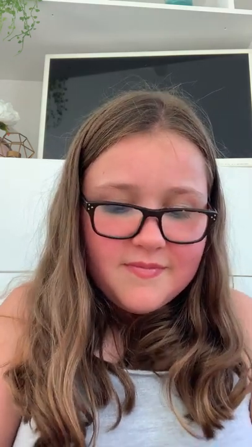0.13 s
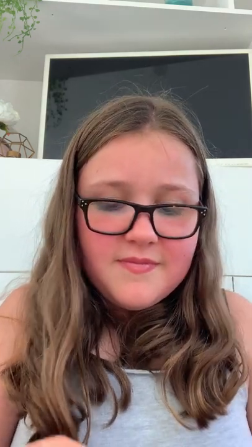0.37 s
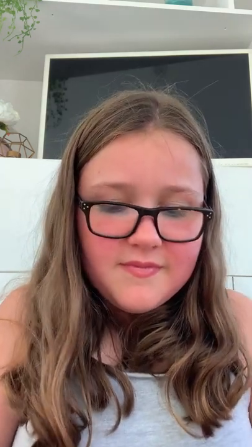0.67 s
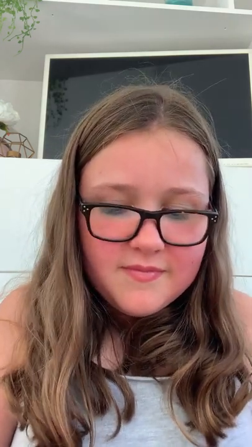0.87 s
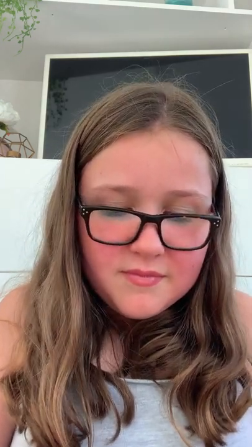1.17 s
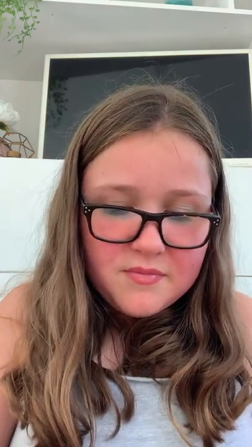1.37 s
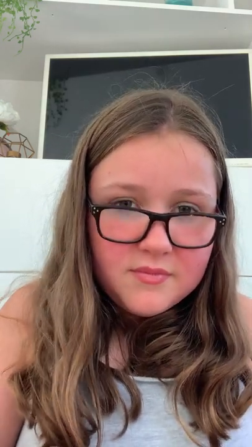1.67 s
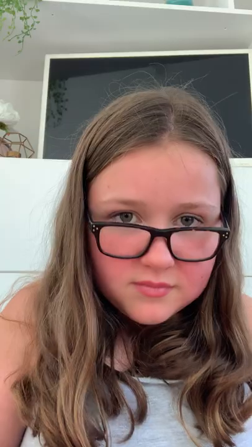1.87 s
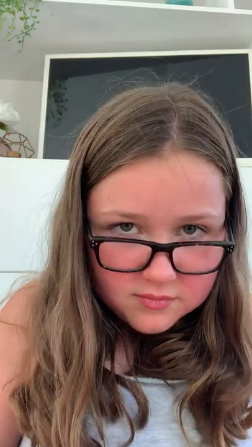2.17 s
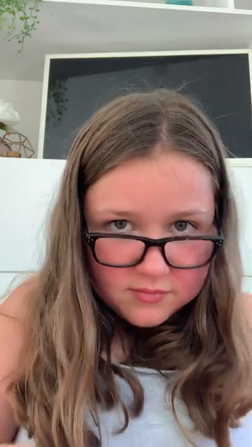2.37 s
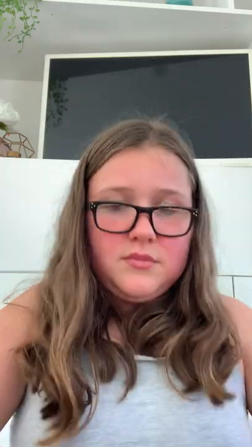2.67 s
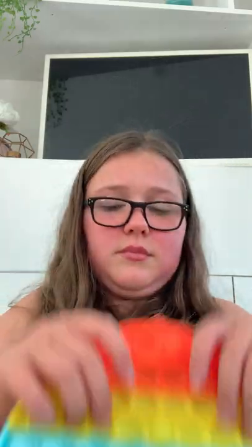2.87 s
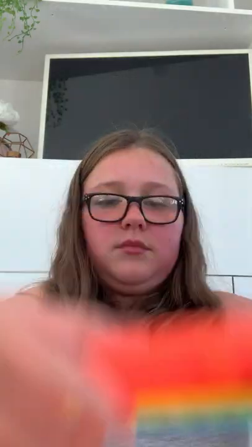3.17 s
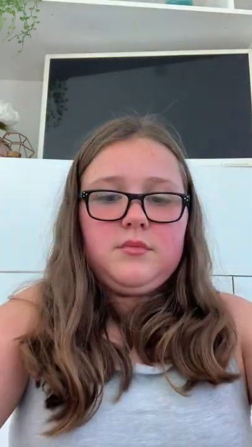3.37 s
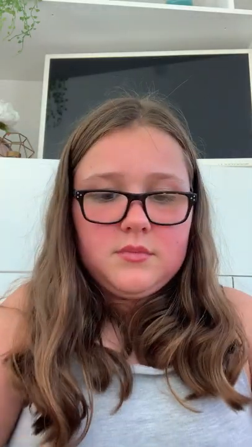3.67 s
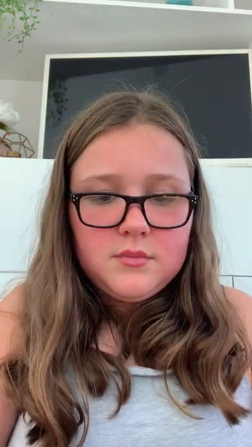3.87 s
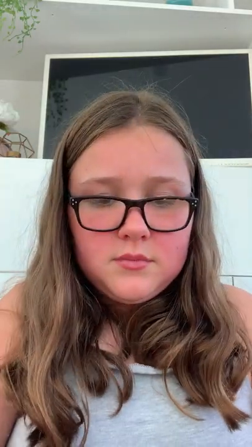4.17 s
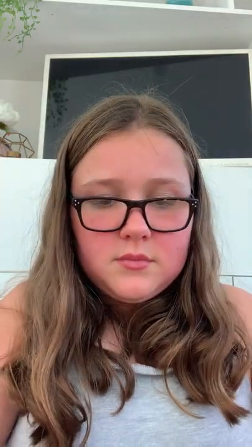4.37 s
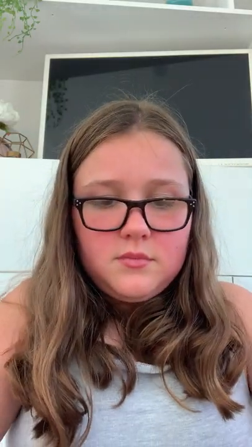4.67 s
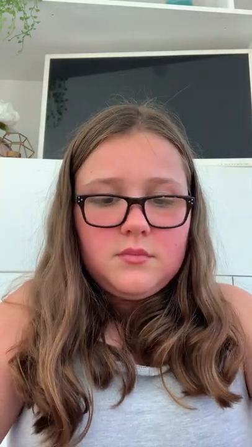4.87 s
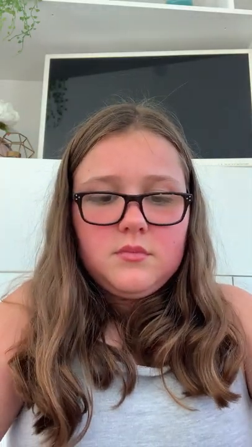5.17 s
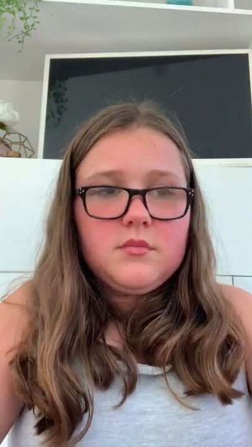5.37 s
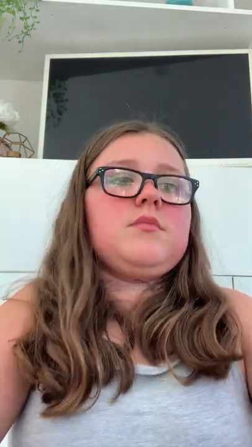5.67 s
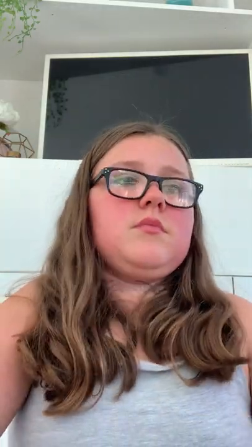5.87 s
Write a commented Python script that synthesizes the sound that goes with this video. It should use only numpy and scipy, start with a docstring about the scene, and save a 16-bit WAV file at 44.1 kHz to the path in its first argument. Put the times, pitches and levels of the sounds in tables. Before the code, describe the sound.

Rubbery bubbles flip through with short, falling, hollow pops and a crisp edge. They start sparse and faint, then come in dense bursts about half a second to a second apart. Fingers and the sheet thump the table underneath, and the sheet scrapes once. Faint rustle and low room air remain; close stereo pickup, small live room.

```python
"""A quiet room: the silicone bubbles of a fidget toy are pressed through on a table, heard close up in stereo.
Bubbles snap singly and in clusters: short gliding tones with a crack of treble, and resonances that ring on.
Fingers thud the table, a bank of decaying modes with a slap of noise; once the sheet is dragged, as
grainy noise through gliding resonances. Faint shaped noise is rustle and room air; sparse taps make the echo."""
import sys
import numpy as np
from scipy import signal
from scipy.fft import rfft, irfft, next_fast_len
from scipy.io import wavfile
from scipy.ndimage import uniform_filter1d

SR = 44100
rng = np.random.default_rng(int(sys.argv[2]) if len(sys.argv) > 2 else 0)


def unload_wav(signal):
    """Save mono or channel-first audio to the path in sys.argv[1] as 16-bit WAV at rate SR, clipped to [-1, 1]."""
    wavfile.write(
        sys.argv[1],
        SR,
        np.round(np.clip(np.atleast_2d(signal).T, -1, 1) * 32767).astype(np.int16),
    )


N = 266099  # length [samples]


def amp(db):
    """Turns dB into a linear gain."""
    return 10 ** (np.asarray(db) / 20)


def evened(x):
    """Scales a signal to rms 1."""
    return x / np.sqrt(np.mean(x ** 2) + 1e-20)


def read(points, hz):
    """Reads a table between its points along log frequency."""
    f, value = np.transpose(points)
    return np.interp(np.log(hz + 1), np.log(f + 1), value)


def curve(points):
    """Gain over the whole scene from a table of (time [s], level [dB])."""
    return amp(np.interp(np.arange(N) / SR, *np.transpose(points)))


def add(mix, s, sound):
    """Adds a sound into the mix at s seconds, cut off at the end of the mix."""
    part = mix[..., max(round(s * SR), 0):][..., :sound.shape[-1]]
    part += sound[..., :part.shape[-1]]


def coloured(x, points):
    """Filters by a spectrum table in dB."""
    size = next_fast_len(x.shape[-1] + 4096)
    gain = amp(read(points, np.fft.rfftfreq(size, 1 / SR)))
    return irfft(rfft(x, size) * gain, size)[..., :x.shape[-1]]


def resonate(x, hz, width):
    """Shifts hz down to zero, smooths, and shifts back: a resonance of gain 1."""
    turn = np.exp(2j * np.pi * np.cumsum(hz * np.ones(len(x))) / SR)
    r = np.exp(-np.pi * width / SR)
    return 2 * (turn * signal.lfilter([1 - r], [1, -r], x / turn)).real


def diffuse(pair):
    """Blends two unrelated signals so that the ears agree in the bass and differ in the treble."""
    # diffuse sound: (frequency [Hz], left-right likeness [0 to 1])
    likeness = [(60, 1), (130, 0.87), (270, 0.64), (570, 1), (1200, 0.061), (2550, 0.058), (5390, 0.1),
                (11400, 0.14)]
    size = next_fast_len(pair.shape[1])
    same = np.clip(read(likeness, np.fft.rfftfreq(size, 1 / SR)), 0, 1)
    a, b = rfft(pair, size)
    right = same * a + np.sqrt(1 - same ** 2) * b
    return irfft(np.array([a, right]), size)[:, :pair.shape[1]]


def patchy(tone, patchy_db, flicker_db):
    """Noise from random short-time spectra with drifting patches and a shared flicker; rms 1."""
    frames, hz = N // 256 + 5, np.fft.rfftfreq(1024, 1 / SR)
    z = rng.standard_normal((frames, 513, 5)).T
    patches = evened(uniform_filter1d(uniform_filter1d(z[4], 10, 0), 12, 1))
    flicker = evened(uniform_filter1d(rng.standard_normal(frames), 6))
    level_db = read(tone, hz)[:, None] + patchy_db * patches + flicker_db * flicker
    spectra = (z[:2] + 1j * z[2:4]) * amp(level_db)
    noise = signal.istft(spectra, nperseg=1024, noverlap=768)[1][:, :N]
    return evened(diffuse(noise))


def air():
    """Room rumble and hiss as shaped noise, with a few fuzzy tones from noise in narrow resonances."""
    # spectrum of the room noise: (frequency [Hz], relative density [dB per Hz])
    air_tone = [(15, -51), (25, -22), (86, -1), (218, -6), (338, -6), (437, -15.5), (581, -23),
                (812, -14.5), (947, -33), (1470, -30), (2280, -37.5), (3530, -26.5), (4810, -39.5),
                (9890, -33), (11800, -48.5), (15400, -84.5), (22000, -120)]
    # wavering tones in the room: (frequency [Hz], width of the first resonance [Hz], rms level [dB])
    hum = [(342.4, 9.7, -71), (96, 6.1, -67), (257, 35, -75.5)]
    # wavering of the rumble: (time [s], gain [dB])
    swell = [(.45, 2.5), (.65, -5.5), (.95, 5.5), (1.1, -2), (1.451, -0.5), (1.65, 2), (2.099, 4)]
    air_db = -64.5  # rms of the noise without tones, before the swell
    tones = np.zeros(N)
    for hz, width, db in hum:
        narrow = resonate(rng.standard_normal(N), hz, width)
        tones += amp(db) * evened(resonate(narrow, hz, 63.0))
    floor = amp(air_db) * patchy(air_tone, patchy_db=1.5, flicker_db=.3) + tones
    rumble = coloured(floor, [(400, 0), (700, -40)])  # (frequency [Hz], gain [dB])
    return floor + (curve(swell) - 1) * rumble


def rustle():
    """Faint skin-on-silicone noise of the hands, shaped by a spectrum and a level curve."""
    # how the rustle comes and goes: (time [s], level [dB])
    rustle_level = [(0, -54.5), (0.239, -69.5), (.6, -78.5), (.72, -76), (.76, -63.5), (.92, -72.5),
                    (1.05, -93), (1.249, -72), (2.15, -74.5), (2.62, -66), (3.22, -71), (3.7, -71),
                    (4.05, -75), (5.002, -81), (5.33, -73.5), (5.6, -56.5), (6.03, -60)]
    # its spectrum: (frequency [Hz], relative density [dB per Hz])
    rustle_tone = [(290, -26.5), (500, -2), (822, -3), (1370, -2.5), (1800, -4), (2100, -8), (3340, -5.5),
                   (7000, -37), (9100, -60.5), (15400, -120)]
    return curve(rustle_level) * patchy(rustle_tone, patchy_db=2.5, flicker_db=.6)


def pops():
    """A dome flips in about 3 ms: a few cycles that fall in pitch, and a crack of treble."""
    # bubbles snapping through, before pan and glide:
    # (time [s], tone peak [dB], nominal pitch [Hz], crack relative to the tone peak [dB])
    snap_events = [(0.1163, -44, 1218, -6.5), (0.2515, -44.5, 796, -14.5), (0.2627, -42, 870, -20.5),
                   (0.3112, -19, 1180, -27), (1.1397, -41, 777, -45), (1.2052, -39, 1080, -39.5),
                   (1.8079, -38.5, 799, -18), (1.9974, -56.5, 1246, -7), (2.1721, -25, 912, -23),
                   (2.1794, -25.5, 853, -13.5), (2.1878, -30, 851, -17), (2.242, -27.5, 1048, -14),
                   (2.251, -27, 941, -13.5), (2.3193, -24, 1023, -18.5), (2.7815, -7, 1283, -20.5),
                   (2.8153, -20, 964, -35.5), (2.8313, -15.5, 1205, -26.5), (2.8613, -30, 977, -8.5),
                   (3.254, -16, 934, -27), (3.2655, -9, 688.7, -21.5), (3.2714, -9.5, 1019, -18.5),
                   (3.3747, -18.5, 1068, -7.5), (3.3853, -20.5, 1087, -18), (3.456, -28.5, 1170, -9),
                   (3.4646, -21.5, 820, -34), (3.7427, -45.5, 830, -30), (3.8606, -53.5, 710, -23),
                   (3.919, -51.5, 752, -17), (3.9358, -51.5, 908, -20.5), (4.147, -14, 1109, -5.5),
                   (4.152, -18, 952, -14), (4.1566, -11.5, 1182, -1), (4.1592, -7, 783, -23.5),
                   (4.1694, -11.5, 1441, -8.5), (4.1718, -12.5, 864.6, -10.5), (4.4755, -36.5, 849, -31.5),
                   (4.4967, -37, 765, -14.5), (4.614, -19.5, 1244, -5.5), (4.6301, -15.5, 1069, -4.5),
                   (4.6418, -6, 1000, -6.5), (4.646, -10, 1209, -11), (4.6496, -16.5, 1145, -8.5),
                   (4.6527, -21.5, 1204, -6.5), (4.6587, -9.5, 1054, -6.5), (4.6699, -16, 1123, -13.5),
                   (5.0226, -51.5, 868, -28), (5.043, -52, 998, -18), (5.1309, -28.5, 995, -39.5),
                   (5.368, -14.5, 1188, -10), (5.3882, -14, 1244, -11), (5.4126, -16, 1016, -5),
                   (5.4491, -15.5, 999, -3.5), (5.4542, -14.5, 1865, -6.5), (5.4607, -12, 1122, -9),
                   (5.6653, -44.5, 904, -26.5), (5.8204, -10.5, 1228, -11), (5.8341, -25.5, 952, -26)]
    # spectrum of the crack: (frequency [Hz], relative density [dB per Hz])
    crack_tone = [(900, -32.5), (1500, 10.5), (2400, 6), (3500, -2), (4800, -10.5), (6300, -18),
                  (9000, -40.5), (12000, -45)]
    pan_centre_db, pan_spread_db = -1, 8  # left over right: a little to the right, domes scatter around that
    settle, fall, fall_loss = 0.7214, .4, 0.2424  # shares of the nominal pitch
    glide_s = 0.00091  # time constant of the fall
    out, t = np.zeros((2, N)), np.arange(-256, 512) / SR
    draws = rng.random((len(snap_events), 3))
    white = rng.standard_normal((len(snap_events), 3, len(t)))
    noise = coloured(white[:, :1] + .5 * white[:, 1:], crack_tone)  # one shared part, one part per side
    for (s, db, hz, crack_db), (turn, spread, side), hiss in zip(snap_events, draws, noise):
        soft = np.clip(-crack_db / 40, 0, 1)  # a gentle flip glides less and rings longer
        glide = hz * (settle + (fall - fall_loss * soft) * np.exp(-np.clip(t, -.002, 1) / glide_s))
        width_s = np.where(t < 0, .0009, 0.0014 + 0.00043 * spread)  # quick rise, slower fall
        shape = np.exp(-(t / (1 + 0.5 * soft) / width_s) ** 2)
        apart = .16 * (side - .5) * np.array([[1], [-1]])  # turns: the louder side leads
        snap = shape * np.cos(2 * np.pi * (np.cumsum(glide) / SR + turn + apart))
        crack_shape = np.exp(-(t / np.where(t < 0, .0009, .0016)) ** 2)
        crack = amp(crack_db) * evened(hiss) * crack_shape
        pan_db = pan_centre_db + pan_spread_db * (side - .5)
        add(out, s + t[0], amp(db) * amp([[pan_db / 2], [-pan_db / 2]]) * (snap + crack))
    return out


def sheet_rings(snaps):
    """The silicone sheet rings on after each snap, as resonances driven by the snaps."""
    # resonances of the sheet: (frequency [Hz], width [Hz], gain [dB])
    sheet_modes = [(694, 65, -3), (1174, 3.3, -8.5), (1580, 6, -5)]
    return sum(amp(db) * resonate(snaps, hz, width) for hz, width, db in sheet_modes)


def room(x):
    """Sparse taps of random sign, each band dying at its own speed; three tails take turns."""
    # decay of the room: (frequency [Hz], time to fall 60 dB [s])
    room_t60 = [(60, 1), (160, 0.42), (420, 0.36), (1100, 0.51), (2910, 0.57), (7680, 0.38)]
    # colour of the echo: (frequency [Hz], gain [dB])
    room_tone = [(100, -4), (400, 2.5), (690, 2.5), (850, 0.5), (1150, 2), (1600, 2), (2100, -0.5),
                 (3000, 1), (4800, -3), (6300, 0.5), (10000, -11)]
    out, t = np.zeros((2, N)), np.arange(N) / SR
    for k in range(3):
        taps = np.zeros((2, SR))
        at = np.arange(120, SR - 20, 20) + rng.integers(0, 20, (2, (SR - 121) // 20))
        np.put_along_axis(taps, at, rng.choice([-1., 1.], at.shape), 1)
        hz, lag, z = signal.stft(taps, SR, nperseg=256)
        near_db = 10.0 * np.exp(-lag / 0.056)  # near surfaces are strong
        z = z * amp(-60 * lag / read(room_t60, hz)[:, None] + near_db)
        z = z * np.clip(lag / 0.0013, .25, 1) ** 2  # little comes back before the first wall answers
        tail = diffuse(coloured(signal.istft(z, SR, nperseg=256)[1], room_tone))
        share = np.sqrt(2 / 3) * np.cos(2 * np.pi * (7 * t + k / 6))  # the three powers add up to 1
        tail = tail / np.linalg.norm(tail[0])
        out += signal.fftconvolve((x * share)[None], tail, axes=1)[:, :N]
    return out


def thuds():
    """A soft push of a finger or of the sheet rings the table top, with a short slap of rubber."""
    # pushes on the table: (time [s], level [dB], weight of the modes below 200 Hz [dB],
    # push length before the deep lag and the 1 ms minimum of the other modes [ms])
    pushes = [(0.261, -43, -26, 7.7), (0.318, -37.5, -13.5, 2.7), (0.776, -48.5, -17, 1.6),
              (1.132, -34.5, -23, 25), (1.163, -45.5, -30, 4.2), (1.204, -39.5, -31, 6.7),
              (1.283, -40.5, -12, 5), (1.615, -44.5, -8, 14), (1.807, -33.5, -17.5, 11),
              (2.005, -52, -11, 5.4), (2.179, -22.5, -20.5, 7.6), (2.205, -30.5, -18.5, 28),
              (2.26, -20.5, -16.5, 14), (2.289, -32.5, -13.5, 11), (2.324, -30, -21, 4.1),
              (2.517, -46, -1.5, 13), (2.93, -18, -21.5, 15), (3.24, -16, -28.5, 11),
              (3.254, -5.5, -31.5, 9), (3.376, -19, -18.5, 6.6), (3.39, -17.5, -22, 2.7),
              (3.408, -26, -10, 4), (3.457, -19.5, -16, 2.4), (3.714, -42, -13.5, 12),
              (3.892, -48.5, -16, 6), (4.151, -14, -12, 8), (4.195, -39, 3, 2.4), (4.47, -35, -14.5, 6.8),
              (4.616, -18.5, -40, 9.1), (4.646, -17, -11.5, 6.8), (4.911, -42, -6, 10),
              (5.125, -39, -15, 5.5), (5.37, -19, -22.5, 7), (5.409, -21, -7.5, 2.7),
              (5.451, -19.5, -10, 7), (5.625, -43, -20, 6.5), (5.669, -43.5, -5, 18), (5.799, -35, -13, 14),
              (5.822, -33.5, -6, 0.96)]
    # modes of the table top: (frequency [Hz], base level [dB], time to fall 60 dB [s])
    table_modes = [(66.03, -9, 1), (87.1, 2, .4), (140.6, 1.5, 0.22), (184.5, -2, 0.32), (255, -9.5, 0.067),
                   (296, 4, 0.064), (340.5, -2.5, 0.089), (469.6, -10, 0.099), (541, -1, 0.043),
                   (671.6, -14.5, 0.081)]
    # the sheet slapping flat: (frequency [Hz], relative density [dB per Hz])
    slap_tone = [(300, -17), (500, -5), (1000, -4), (1700, -4.5), (3000, -20.5), (6000, -56),
                 (12000, -63.5)]
    slap_db, slap_t60, high_db = -13, 0.041, -2.5  # base levels of slap and of modes above 400 Hz; t60 in s
    later_db_per_s, hard_db_per_db = 1.75, 0.18  # later and harder pushes have more slap and high modes
    deep_lag_ms = 7.2  # deep modes build slowly
    phase_spread = .25  # turns: a push starts the modes nearly together
    out, t = np.zeros(N), np.arange(SR // 2) / SR
    draws = rng.random((len(pushes), len(table_modes), 2))
    slaps = evened(coloured(rng.standard_normal((len(pushes), len(t))), slap_tone))
    hz, db, t60 = np.transpose(table_modes)[:, :, None]
    for (s, level_db, weight_db, ms), draw, slap in zip(pushes, draws, slaps):
        rise_ms = np.where(hz < 200, ms + deep_lag_ms, max(ms, 1))
        rise = np.sin(np.pi / 2 * np.clip(t * 1000 / rise_ms, 0, 1)) ** 2
        spot_db = 4 * (draw[:, :1] - .5)  # each spot favours other modes
        brisk_db = later_db_per_s * s + hard_db_per_db * level_db
        band_db = np.where(hz < 200, weight_db, np.where(hz > 400, high_db + brisk_db, 0))
        wave = np.sin(2 * np.pi * (hz * t + phase_spread * draw[:, 1:]))
        ring = amp(db + band_db + spot_db - 60 * t / t60) * wave
        slap_part = rise[-1] * amp(slap_db + brisk_db - 60 * t / slap_t60) * slap
        add(out, s, amp(level_db) * ((rise * ring).sum(0) + slap_part))
    return out


def drag():
    """Stick-slip grains of the sheet, ringing in the domes; the table takes the low part."""
    # the sheet dragged over the table:
    # (time [s], level [dB], dome resonance [Hz], low scrape relative to the level [dB])
    drag_path = [(2.56, -77, 769, 10.5), (2.682, -41, 690, -19.5), (2.77, -24.5, 840, -12.5),
                 (2.794, -24, 943, -20.5), (2.88, -27.5, 800, -14), (2.985, -45, 641, 10),
                 (3.1, -102, 959, -1.5)]
    # filter on the grains and dome ringing: (frequency [Hz], gain [dB])
    drag_tone = [(88, -51), (150, -15.5), (405, 0.5), (571, -4), (689, -8), (1020, -5), (2250, -14.5),
                 (2670, -16.5), (3890, -27), (9000, -91.5), (11700, -113), (19800, -120)]
    s, *columns = np.transpose(drag_path)
    t = np.arange(s[0], s[-1], 1 / SR)
    level_db, hz, low_db = (np.interp(t, s, c) for c in columns)
    grip = evened(uniform_filter1d(uniform_filter1d(rng.standard_normal(len(t)), 150), 150))
    slips = rng.standard_normal((3, len(t))) * amp(3.5 * grip)
    near = slips[0] + .55 * slips[1:]  # one shared part, one part per side
    domes = np.array([resonate(v, hz, 300.) for v in near])
    sheet = evened(coloured(near + 4.5 * domes, drag_tone))
    low = resonate(resonate(slips[0], 260.0, 120.), 250.0, 240.0)
    low = evened(resonate(low, 200.0, 350.0))
    out = np.zeros((2, N))
    add(out, s[0], amp(level_db) * (sheet + amp(low_db) * low) * amp([[-1.5], [1.5]]))
    return out


def scene():
    """Sums the direct sounds, the sheet's ringing, the room echo, the rustle and the air."""
    snaps, table, sheet = pops(), thuds(), drag()
    rings = sheet_rings(snaps.mean(0))
    wet = room(amp(-11.5) * snaps.mean(0) + amp(-9.5) * table + amp(-12.5) * sheet.mean(0))
    table_pair = table * amp([[-.6], [.6]])  # a little to the right
    return snaps + rings + table_pair + sheet + wet + rustle() + air()


def record(dry):
    """Left and right carry each frequency out of step; deep bass is cut, peaks round off, treble is limited."""
    # phase between the channels: (frequency [Hz], lead of the left [rad])
    left_lead = [(0, 0), (170, -.5), (860, -.3), (2500, -.7), (3800, -.1), (4650, -.7), (5300, -2.1),
                 (5700, -4), (6700, -5.3), (8400, -6.3), (11200, -8.1)]
    edge_hz = 12100
    size = next_fast_len(N + 4096)
    hz = np.fft.rfftfreq(size, 1 / SR)
    lead = np.interp(hz, *np.transpose(left_lead))
    bass_cut = 1 / np.sqrt(1 + (46.0 / (hz + 1)) ** 6)
    shift = np.exp(.5j * np.array([lead, -lead]))
    pair = irfft(rfft(dry, size) * bass_cut * shift, size)[:, :N]
    rounded = pair / (1 + (pair / .95) ** 6) ** (1 / 6)
    band_limit = signal.firwin(511, edge_hz, window=("kaiser", 9), fs=SR)
    return signal.oaconvolve(rounded, band_limit[None], "same")


dry = scene()
out = record(dry)
unload_wav(out)
```